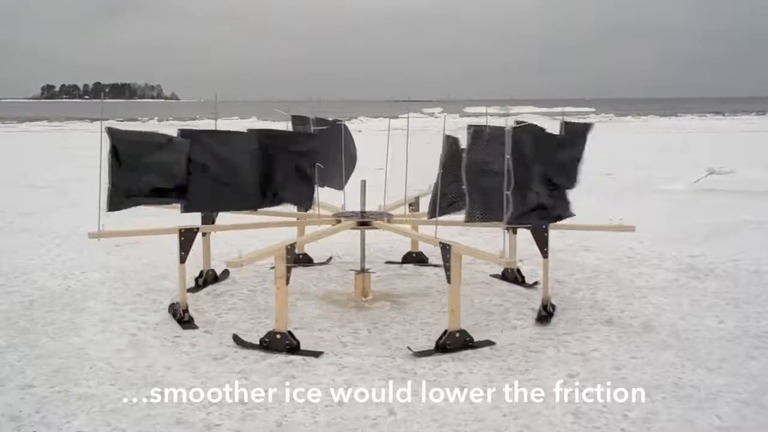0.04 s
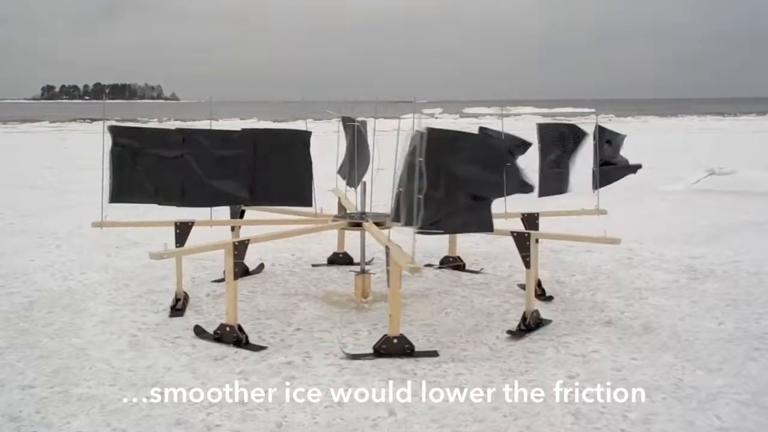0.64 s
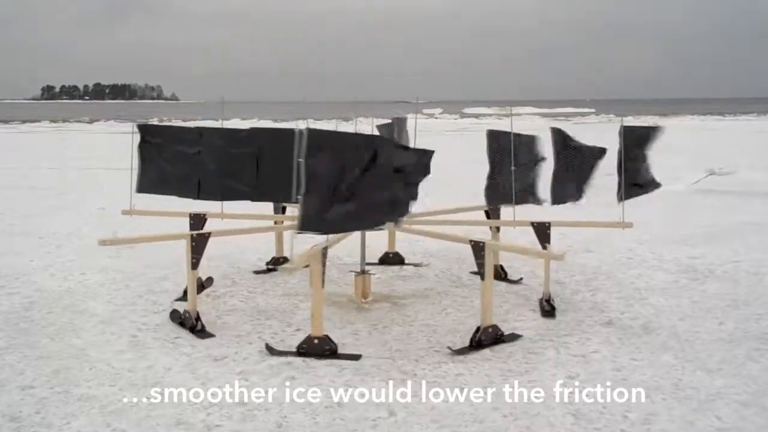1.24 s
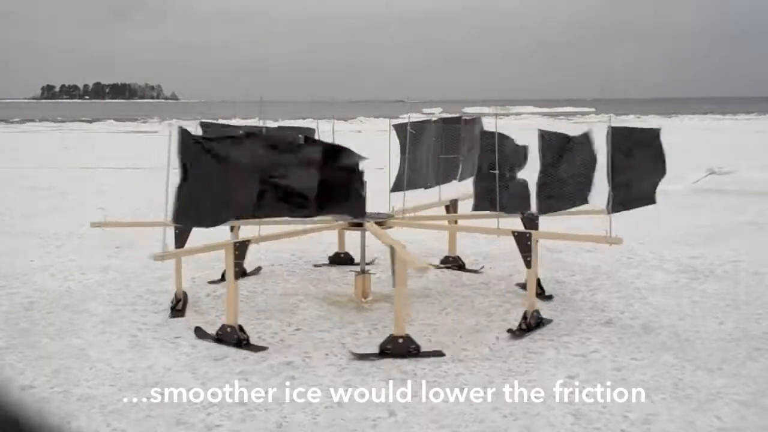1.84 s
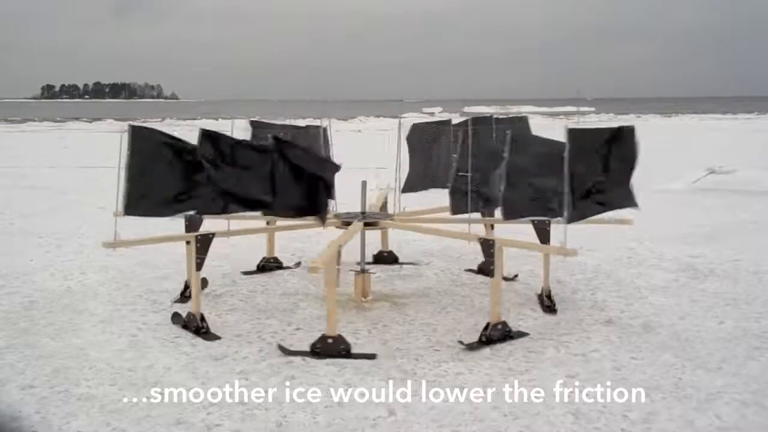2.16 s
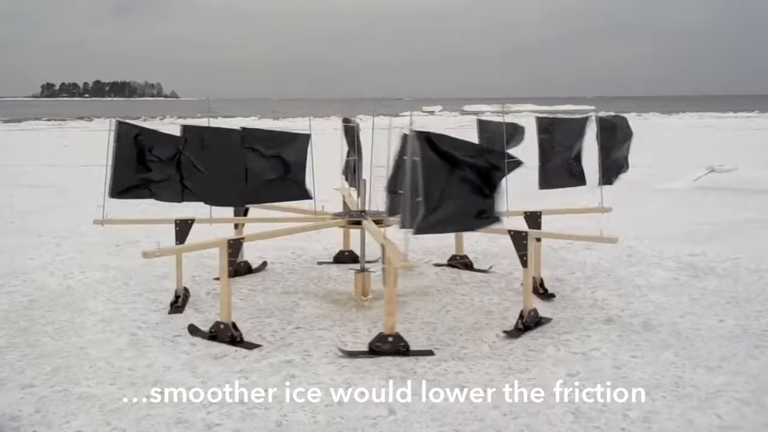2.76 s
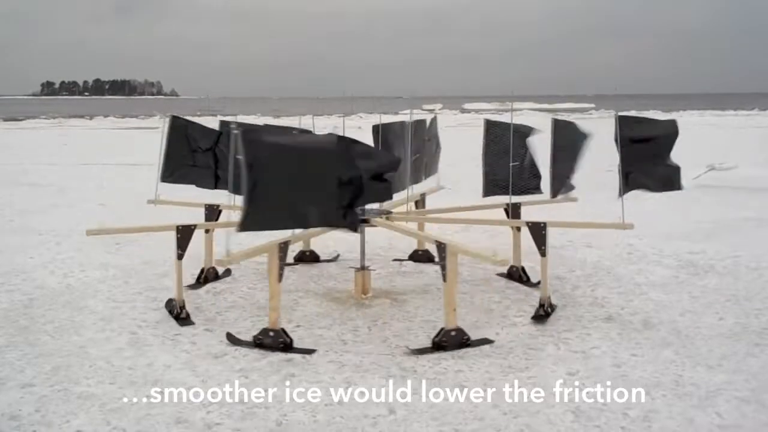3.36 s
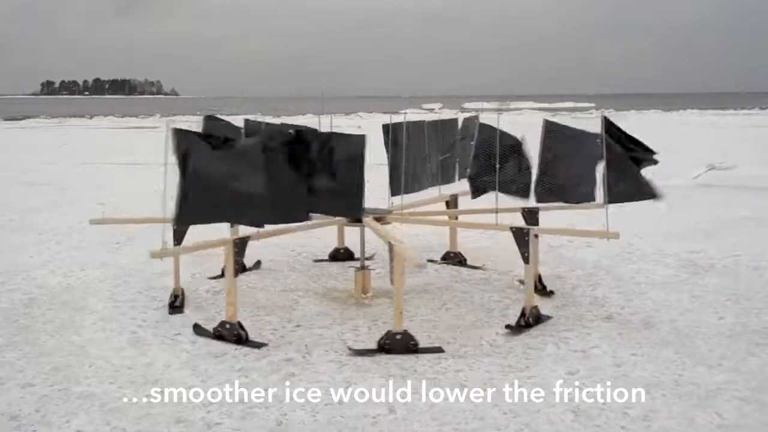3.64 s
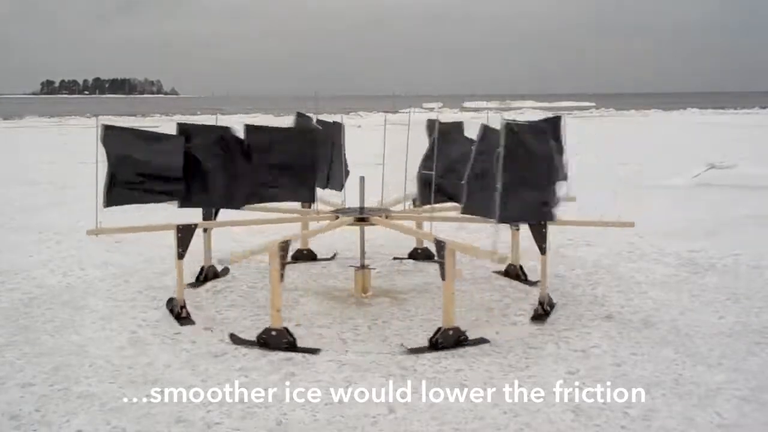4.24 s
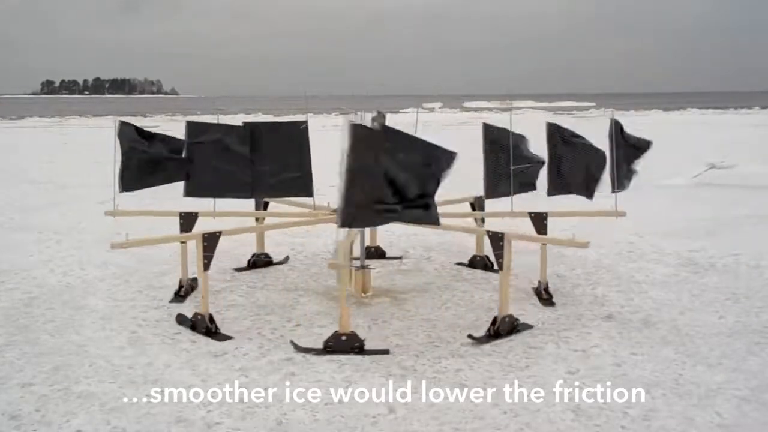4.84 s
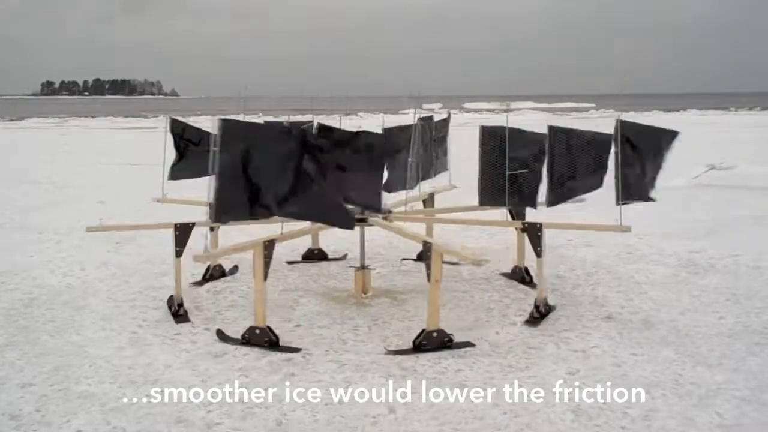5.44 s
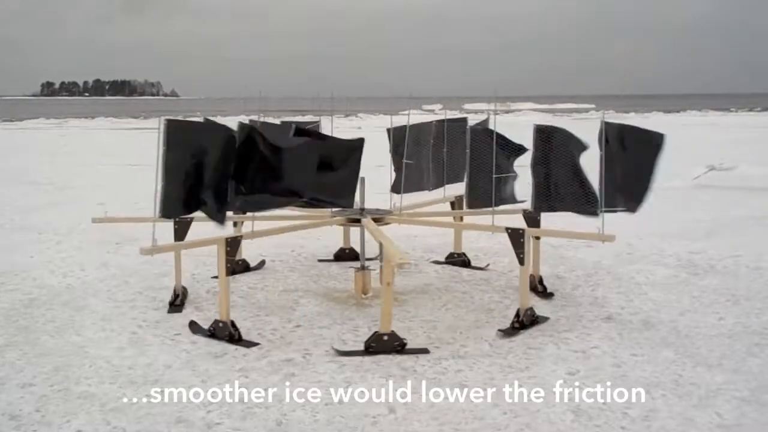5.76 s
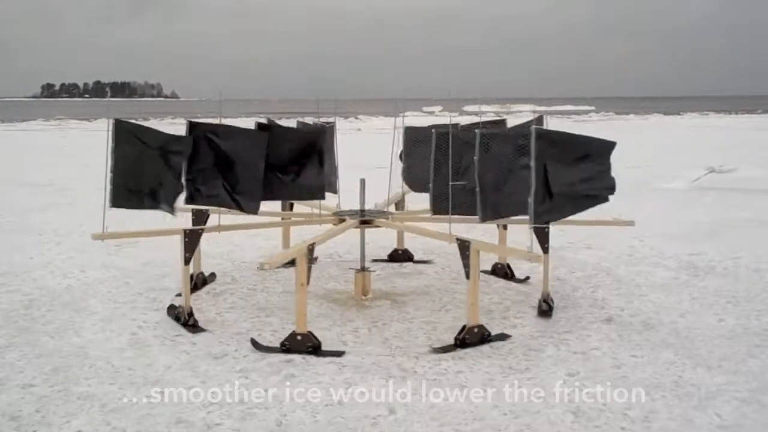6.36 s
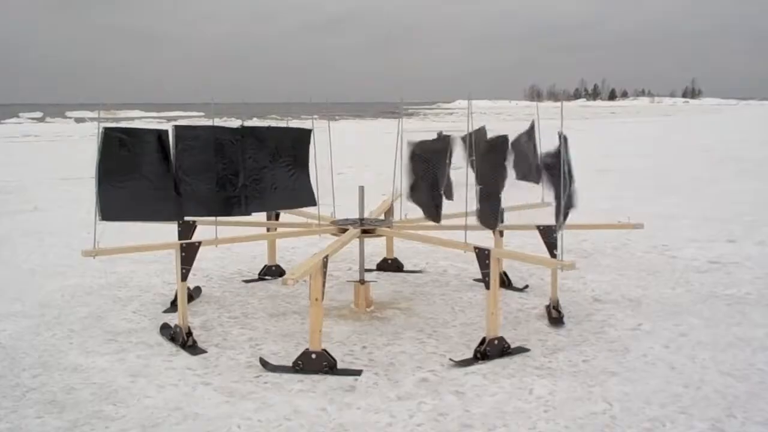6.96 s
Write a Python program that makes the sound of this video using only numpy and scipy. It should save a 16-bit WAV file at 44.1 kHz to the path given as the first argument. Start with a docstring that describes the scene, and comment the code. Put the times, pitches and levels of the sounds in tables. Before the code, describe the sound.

Quick, uneven gusts hit the microphone from the start, rumbling, crackling and snapping, strongest on the left side. A quieter gritty scrape runs beneath them as a carousel on skis turns on an icy shore, with occasional small crunches. Later the gusts die down and the scraping stands out before it fades too. After a very brief dropout, deeper wind buffets both sides.

```python
"""A wooden carousel on skis, driven by cloth sails, turns on a frozen shore in gusty wind.
From the start, gusts buffet the two microphone ports, the left one most, with rumble, crackle and
sharp snaps, while the skis scrape over grainy ice and now and then crunch through its crust.
Around 5 s the wind eases. At 6.65 s the sound drops out briefly, and the wind returns deeper."""
import sys
import numpy as np
from scipy import signal
from scipy.fft import rfft, irfft
from scipy.io import wavfile
from scipy.ndimage import uniform_filter1d

SR = 44100
rng = np.random.default_rng(int(sys.argv[2]) if len(sys.argv) > 2 else 0)


def transcribe(u):
    """Save the signal u as a 16-bit wav file named by the first command-line argument.

    u: samples, shape (n,) or (channels, n), limited to [-1, 1]; the rate is SR.
    q: integer samples, one column per channel.
    """
    v = np.clip(np.atleast_2d(u).T, -1, 1)
    q = np.round(v * 32767).astype(np.int16)
    wavfile.write(sys.argv[1], SR, q)


N = 308700
TIME = np.arange(N) / SR
FREQ = np.maximum(np.arange(N // 2 + 1) * SR / N, 1)

# Levels are relative within each layer; "depth" is the weight of the lows over the mids.
# bed of breeze between the gusts: time_s, left_db, right_db
BREEZE = [(0, -39, -33.5), (.7, -44.5, -42.5), (1.6, -33.5, -41), (2.3, -40, -43), (3.301, -29, -43.5),
          (4.1, -36.5, -42), (4.6, -46.5, -45), (5.2, -47.5, -56), (5.7, -48, -52), (6.3, -52, -58),
          (6.6, -50, -56), (6.7, -49, -46), (7, -48, -43)]
# gusts, the right port sheltered: start_s, length_s, left_db, right_db, left_depth_db, right_depth_db
GUSTS = [(0.01, 0.02, -27.5, -30.5, -7, 2), (0.071, .1, -24.5, -27, -13, 1),
         (0.203, 0.064, -25.5, -26.5, -9, -1), (0.273, 0.069, -35, -24.5, -10, 6),
         (0.36, .055, -24, -25.5, -8, -15), (0.488, 0.067, -30.5, -39.5, -2, -6),
         (0.568, .03, -24, -36, -3.5, -6), (0.788, 0.062, -23.5, -36, -10, -4),
         (0.876, .035, -26, -29.5, -14, -3), (0.949, 0.027, -21.5, -38, -21, -2),
         (1.017, 0.032, -36, -38, -7, -2), (1.205, 0.022, -27, -44, -11, 0),
         (1.282, 0.057, -20, -32, -5.5, 1), (1.346, 0.098, -22.5, -50, -11.5, 0),
         (1.467, 0.073, -20, -35, -0.5, 2), (1.584, 0.071, -23, -30.5, -3.5, 2),
         (1.742, 0.19, -22.5, -36, -8.5, 1), (1.954, 0.097, -24, -39, -8, -1),
         (2.08, 0.032, -29.5, -41, -13, -1), (2.136, 0.039, -21.5, -40, -12, -2),
         (2.253, 0.12, -33.5, -39.5, -10, -2), (2.382, .16, -23, -42, -6.5, -3),
         (2.55, .17, -22.5, -36, -4, -5), (2.744, .13, -24, -40, -1, -5), (2.888, 0.11, -19.5, -35, 2, -7),
         (3.001, 0.048, -24, -36, -6, -8), (3.094, 0.18, -29.5, -39, -4.5, -5),
         (3.24, 0.088, -25.5, -43, -4.5, -6), (3.372, .12, -24.5, -40.5, -3.5, -6),
         (3.502, 0.18, -23.5, -36.5, -1.5, -3), (3.742, 0.1, -20.5, -35.5, -3, -2),
         (3.856, 0.08, -25.5, -37, -8.5, -2), (3.966, 0.095, -27, -56, -9, -3),
         (4.14, 0.083, -36, -43, -1, -3), (4.228, 0.071, -23, -46, -2.5, -3),
         (4.329, 0.065, -28, -41, -7, -3), (4.418, .015, -29, -34, 0, -2), (4.466, .021, -26, -43, -13, -2),
         (4.517, 0.02, -26, -41, -8, -2), (4.57, 0.044, -41, -47, -4, -2), (4.716, .05, -37, -44, -8, -2),
         (4.796, 0.062, -26.5, -56, -14.5, -1), (6.01, .03, -39, -51, 8, 3),
         (6.223, .025, -41.5, -59, 14, 3), (6.714, .075, -34, -34.5, -4, 7),
         (6.797, .025, -28, -28, -2, -6), (6.852, 0.067, -31, -35, 4, -6), (6.955, .03, -36, -39, 13, 15.5)]
# tone of the rushing air: frequency_hz, gain_db
RUSH_EQ = [(25, -50), (60, -32), (130, -31.5), (250, -21.5), (450, -8.5), (750, 0.5), (1120, 3), (1600, 0),
           (2080, -13), (3200, -24), (6500, -40), (8000, -106), (13000, -76)]
# single slaps of air on the ports: start_s, length_s, left_db, right_db, depth_db
BUFFETS = [(0.285, 0.018, -32, -21, 3), (0.355, 0.008, -25, -20, 0), (0.394, 0.008, -22, -26, -8),
           (0.489, 0.011, -27, -34, -8), (0.786, 0.024, -22, -41, -9), (0.876, 0.016, -22, -34, -13),
           (0.914, 0.007, -24, -39, -9), (0.949, 0.018, -23, -40, -14), (1.028, 0.01, -27, -38, -10),
           (1.052, 0.012, -28, -38, -8), (1.71, 0.012, -25, -41, -9), (1.966, 0.011, -20, -36, -14),
           (2.027, 0.016, -19, -33, -3), (3.911, 0.009, -22, -36, -17), (3.952, 0.012, -24, -45, -11),
           (4.148, 0.006, -23, -39, -6), (4.333, 0.024, -22, -37, -10), (4.424, 0.012, -25, -32, -6),
           (4.912, 0.016, -29, -40, -4), (4.95, 0.012, -33, -40, -4), (5.402, 0.009, -31, -47, 1),
           (5.498, 0.014, -34, -43, 3), (5.729, 0.01, -27, -44, 6), (5.759, 0.005, -25, -39, 5),
           (5.843, 0.006, -29, -44, 2), (5.985, 0.018, -30, -45, 5), (6.184, 0.004, -27, -47, 8),
           (6.216, 0.012, -32, -51, 9), (6.708, 0.01, -32, -31, 2), (6.75, 0.009, -25, -27, 2),
           (6.766, 0.012, -26, -26, 1), (6.812, 0.017, -19, -21, 1), (6.874, 0.005, -18, -21, 7),
           (6.888, 0.004, -18, -26, 11), (6.917, 0.005, -23, -41, 0), (6.936, 0.004, -25, -32, 12),
           (6.961, 0.005, -22, -37, 6)]
# how readily the gusts crackle: time_s, gain_db
CRACKLINESS = [(0, 7), (.7, 1.5), (1.3, 2), (1.8, 3.5), (2.25, -2), (2.65, 4), (3.1, 0.5), (3.6, 0.5),
               (3.9, -1), (4.45, -2), (4.8, -16), (6.3, -14), (6.7, 10), (6.8, 11)]
# bright tone of the crackle: frequency_hz, gain_db
CRACKLE_EQ = [(300, -25), (1500, -91), (3500, 16), (6500, 14.5), (8500, 3), (10500, 7.5), (12000, 1.5),
              (13400, -36)]
# wind pressing on the whole microphone housing: time_s, level_db
PRESSURE = [(0, -47), (.6, -55.5), (1.6, -52), (2.2, -54.5), (2.9, -58), (3.8, -58.5), (4.5, -53),
            (5.2, -60), (6.2, -56.5), (6.4, -75), (6.62, -80), (6.69, -44), (6.8, -39), (6.99, -38)]
# dark tone of that pressure: frequency_hz, gain_db
RUMBLE_EQ = [(25, -14), (50, -9.5), (100, -3.5), (200, 2.5), (320, 10.5), (600, 12.5), (2000, -42),
             (6000, -80)]
# how hard the skis drag: time_s, level_db
DRAG = [(0, -48.5), (.2, -49), (.55, -55.5), (.7, -53.5), (1.15, -50), (1.55, -55), (1.72, -47), (2.3, -47),
        (3.7, -49.5), (4.6, -50), (4.85, -50.5), (5.9, -51.5), (6.15, -54.5), (6.55, -59.5), (6.76, -52),
        (6.88, -69.5), (6.98, -46)]
# a ski bites into rougher ice, lifting the drag: peak_s, boost_db
BITES = [(1.0, 2), (1.9, 0.5), (2.2, 3.5), (2.38, 3), (2.52, 2), (2.65, 4.5), (2.97, 4), (3.1, 4.5),
         (3.22, 3), (3.48, 6), (3.71, -0.5), (4.18, 4.5), (4.62, 4), (5.94, 3.5), (6.16, 3.5)]
# a ski breaks through crust: start_s, length_s, level_db
CRUNCHES = [(0.466, 0.0093, -52), (0.828, 0.0033, -43), (1.01, 0.0097, -48), (1.919, 0.0044, -40),
            (2.349, 0.01, -42), (3.092, 0.0098, -46), (3.208, 0.016, -46), (3.641, .008, -45),
            (4.165, .012, -48), (4.583, 0.0086, -43.5), (5.123, 0.0068, -46), (5.315, 0.0027, -52),
            (5.639, 0.032, -45.5), (6.001, 0.0088, -47.5), (6.09, 0.0039, -48.5), (6.724, 0.017, -39.5),
            (6.77, 0.01, -54)]
# tone of skis on ice: frequency_hz, gain_db
ICE_EQ = [(30, -47), (150, -27), (350, -11), (650, 1), (1300, 8.5), (2100, 0), (3000, -4.5), (3900, -5),
          (4900, -12.5), (6000, -3.5), (7100, -5), (7900, -38.5), (10300, -32), (13000, -71)]
# the skis lie nearer the left port: frequency_hz, left_over_right_db
ICE_BALANCE = [(300, 11), (1200, 0), (2200, 1.5), (3900, 7.5), (7000, 2.5), (12000, 6.5)]
# sharp snaps on the ports: time_s, left_db, right_db
SNAPS = [(.029, -16.5, -45), (.174, -20, -52), (.397, -16.5, -42), (2.148, -18, -45), (3.887, -17, -46),
         (4.301, -26, -42), (4.427, -25, -40), (6.757, -27, -30), (6.77, -23, -28), (6.828, -12.5, -31),
         (6.877, -37, -44), (6.918, -30, -44), (6.963, -30, -40)]
# tone of a snap: frequency_hz, gain_db
SNAP_EQ = [(300, -20), (1500, -6), (4500, 13.5), (7000, -6), (9000, 4.5), (12500, -11)]
# narrow notches in the tone of the whole mix: centre_hz, width_hz, cut_db
TONE_NOTCHES = [(2430, 150, 38), (3015, 85, 11), (4950, 80, 5), (8070, 260, 14)]

BREEZE_DEPTH_DB = [-5.5, -1]  # left, right
GUST_ATTACK_S, GUST_RELEASE_S = .018, .016
WAVER_HZ, WAVER_DB = 21.7, 0.5
BITE_WIDTH_S = 0.029
DROPOUT_S, DROPOUT_WIDTH_S, DROPOUT_DB = 6.652, 0.025, -24
LOW_CUT_HZ, HIGH_CUT_HZ = 45, 13100


def amp(db):
    """Decibels to gain."""
    return 10 ** (np.asarray(db) / 20)


def unit(x):
    """Scale to rms 1."""
    return x / np.sqrt(np.mean(x ** 2) + 1e-18)


def curve(rows):
    """Automation line through (time_s, value) points."""
    return np.interp(TIME, *np.transpose(rows))


def colour(x, points):
    """EQ a signal through (frequency_hz, gain_db) points."""
    hz, db = np.transpose(points)
    return irfft(rfft(x) * amp(np.interp(np.log(FREQ), np.log(hz), db)), N)


def walk(hz):
    """Smooth random drift of rms 1, moving at up to about hz."""
    return unit(irfft(rfft(rng.standard_normal(N)) * np.exp(-(FREQ / hz) ** 2), N))


def flicker(hz, spread_db):
    """A wandering gain whose short-term power stays near 1."""
    gain = amp(spread_db * walk(hz))
    return gain / np.sqrt(uniform_filter1d(gain ** 2, size=4000))


def grains(per_s, spread_db):
    """Clicks at random times, a few louder than the rest."""
    hit = rng.random(N) < per_s / SR
    size = amp(spread_db * np.minimum(rng.exponential(size=N), 4))
    return unit(hit * size * rng.choice([-1, 1], N))


def burst(time, start, length, edge_s=0.00072):
    """Short gate with ramped edges."""
    corners = [start - edge_s, start + edge_s, start + length, start + length + 3 * edge_s]
    return np.interp(time, corners, [0, 1, 1, 0])


def bump(middle, width):
    """Bell-shaped envelope around a moment."""
    return np.exp(-np.minimum(((TIME - middle) / width) ** 2, 20))


def gust(start, length):
    """Envelope of one gust: it rises, holds and dies away."""
    rise = np.clip((TIME - start) / GUST_ATTACK_S + 1, 0, 1)
    return rise * np.exp(-np.clip((TIME - start - length) / GUST_RELEASE_S, 0, 20))


def airflow(side):
    """Level and depth at one port in dB: gusts pile onto the breeze; the strongest leads the depth."""
    times, *breeze_db = np.transpose(BREEZE)
    total_power = amp(np.interp(TIME, times, breeze_db[side])) ** 2
    weighted_depth = total_power * BREEZE_DEPTH_DB[side]
    for start, length, left_db, right_db, left_depth_db, right_depth_db in GUSTS:
        power = (gust(start, length) * amp((left_db, right_db)[side])) ** 2
        total_power += power
        weighted_depth += power * (left_depth_db, right_depth_db)[side]
    level_db = 10 * np.log10(total_power) + WAVER_DB * walk(WAVER_HZ)
    return level_db, weighted_depth / total_power


def crackle(small_eddies, pops, level_db):
    """Clusters of bright clicks that break out when the small, fast eddies are strong."""
    force = small_eddies ** 3 / (small_eddies ** 2 + amp(-24) ** 2)
    clicks = np.tanh((pops + grains(400, 4)) * flicker(60, 4.5) / 30)
    return amp(level_db + curve(CRACKLINESS)) * force * unit(colour(clicks, CRACKLE_EQ))


def port_wind(level_db, depth_db, buffets_db, split_hz, pop_db, crackle_db):
    """Wind on one port: eddies churn, pop and slap in the opening and make it crackle."""
    pops = grains(700, 5)
    air = rfft(colour(rng.standard_normal(N) + amp(pop_db) * pops, RUSH_EQ))
    low_share = 1 / (1 + (FREQ / split_hz) ** 6)
    lows, mids = unit(irfft(air * low_share, N)), unit(irfft(air * (1 - low_share), N))
    duck, slap_lows, slap_mids = np.ones(N), np.zeros(N), np.zeros(N)
    for (start, length, _, _, slap_depth_db), db in zip(BUFFETS, buffets_db):
        near = slice(int((start - .03) * SR), int((start + length + .01) * SR))
        gate = burst(TIME[near], start, length)
        # the air slackens just before it slaps the port
        duck[near] *= (1 - gate) * (1 - .55 * burst(TIME[near], start - .018, .017))
        slap_air = amp(slap_depth_db) * lows[near] + mids[near]
        slap = gate * amp(db) / np.sqrt(np.average(slap_air ** 2, weights=gate ** 2))
        slap_mids[near] += slap
        slap_lows[near] += slap * amp(slap_depth_db)
    # big eddies move the weight to the lows at the same total power
    depth = amp(depth_db)
    flow = duck * amp(level_db) * flicker(hz=85, spread_db=1) / np.sqrt(1 + depth ** 2)
    small_eddies, big_eddies = flow + slap_mids, flow * depth + slap_lows
    return big_eddies * lows + small_eddies * mids + crackle(small_eddies, pops, crackle_db)


def wind():
    """Each port catches its own eddies; the hardest slaps are soft-clipped."""
    _, _, left_db, right_db, _ = np.transpose(BUFFETS)
    left_flow, right_flow = airflow(0), airflow(1)
    left = port_wind(*left_flow, left_db, split_hz=910, pop_db=-6, crackle_db=-19)
    right = port_wind(*right_flow, right_db, split_hz=677, pop_db=0, crackle_db=-33)
    ceiling = .7
    rounded = ceiling * np.tanh(np.array([left, right]) / ceiling)
    # slow pressure leaks past the narrow openings, thinning the bass
    leak = 1 / np.sqrt(1 + (210 / FREQ) ** 4)
    return irfft(rfft(rounded) * leak, N)


def rumble():
    """Low pressure swings of the wind on the housing, partly shared by both ports."""
    shared = rng.standard_normal(N)
    left, right = [unit(colour(shared + 2 * rng.standard_normal(N), RUMBLE_EQ)) for _ in range(2)]
    return amp(curve(PRESSURE)) * flicker(22, 1.4) * np.array([amp(5) * left, right])


def skis():
    """Runners catch and slip on ice grains, bite into rough patches and crunch through crust."""
    bites_db = sum(db * bump(peak, BITE_WIDTH_S) for peak, db in BITES)
    drag = amp(curve(DRAG) + bites_db)
    grit = grains(5000, 3.25) * flicker(38, 2.8)
    slide = rng.standard_normal(N) * flicker(2.2, 1.9)
    scrape = drag * unit(grit + amp(-6) * slide)
    crust = sum(amp(db) * burst(TIME, start, length) for start, length, db in CRUNCHES)
    scrape += crust * grains(9000, 1)
    # grit in opposite polarity gives the width of skis spread round the ring
    width = amp(-12) * drag * grains(6000, 6.1)
    left, right = colour(scrape + width, ICE_EQ), colour(scrape - width, ICE_EQ)
    return amp(12) * np.array([colour(left, ICE_BALANCE), right])


def snaps():
    """Lone sharp ticks on the ports, brightest in the low treble."""
    ticks = np.zeros((2, N))
    for start, left_db, right_db in SNAPS:
        ticks[:, int(start * SR)] = amp([left_db, right_db])
    return np.array([colour(side, SNAP_EQ) for side in ticks])


def scene():
    """Wind on the ports over the scraping carousel; the whole mix drops out once."""
    dropout = amp(DROPOUT_DB * bump(DROPOUT_S, DROPOUT_WIDTH_S))
    return (wind() + rumble() + snaps() + skis()) * dropout


def record(dry):
    """EQ on the whole mix: shed the deepest rumble, carve a few narrow notches and cut the top."""
    notches_db = sum(db * np.exp(-((FREQ - hz) / width) ** 2) for hz, width, db in TONE_NOTCHES)
    low_cut = 1 / np.sqrt(1 + (LOW_CUT_HZ / FREQ) ** 4)
    heard = irfft(rfft(dry) * amp(-notches_db) * low_cut, N)
    high_cut = signal.ellip(8, .2, 70, HIGH_CUT_HZ, fs=SR, output="sos")
    return signal.sosfilt(high_cut, heard)


dry = scene()
out = record(dry)
transcribe(out)
```